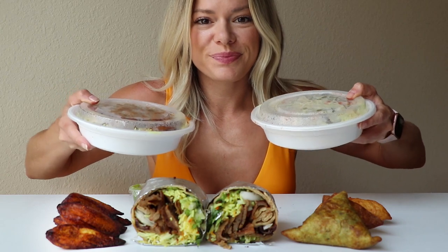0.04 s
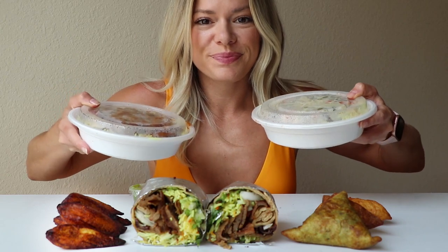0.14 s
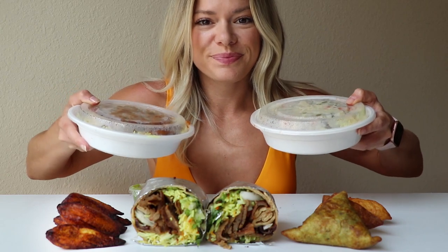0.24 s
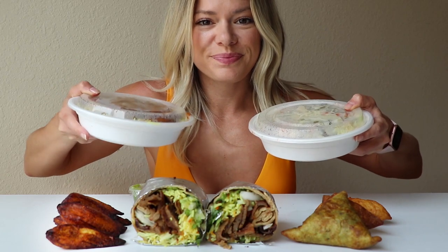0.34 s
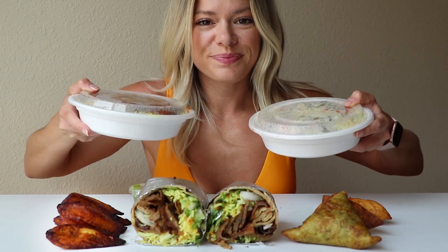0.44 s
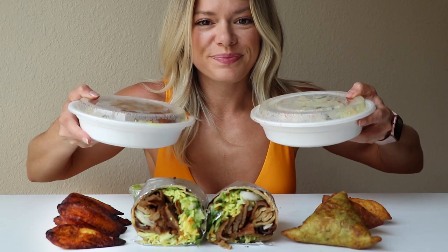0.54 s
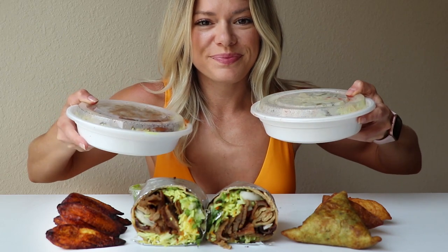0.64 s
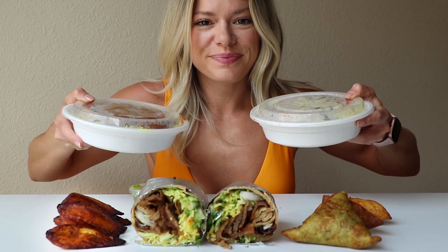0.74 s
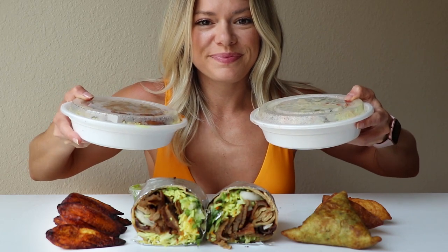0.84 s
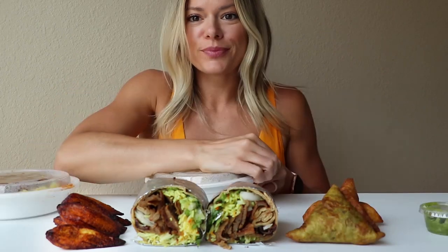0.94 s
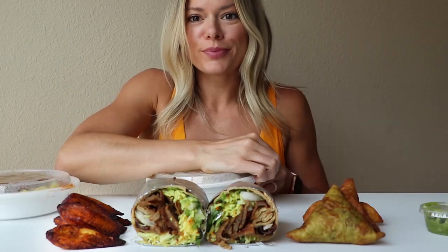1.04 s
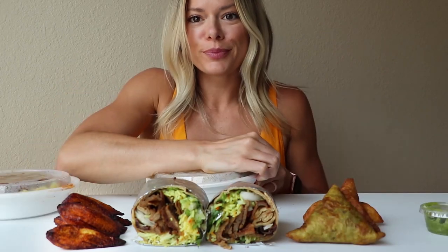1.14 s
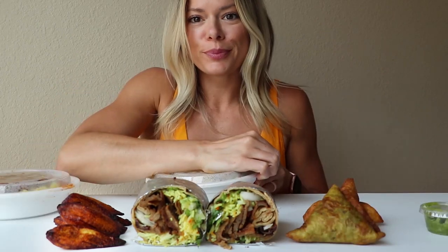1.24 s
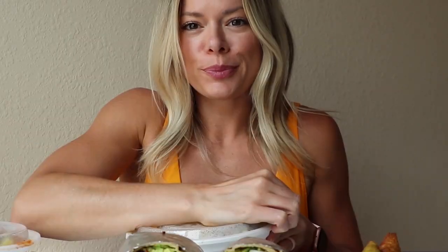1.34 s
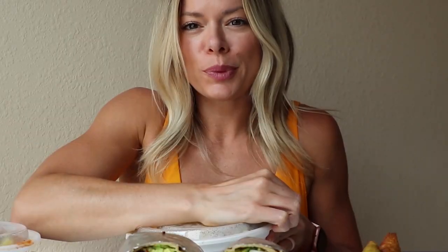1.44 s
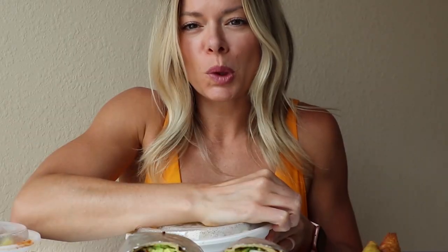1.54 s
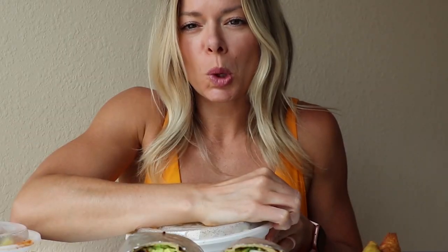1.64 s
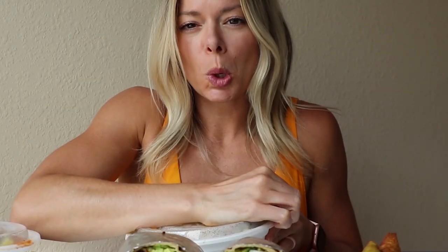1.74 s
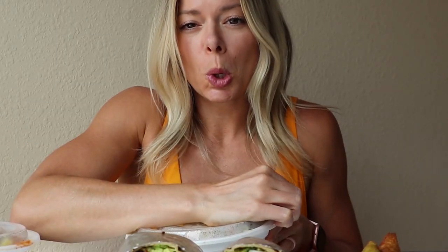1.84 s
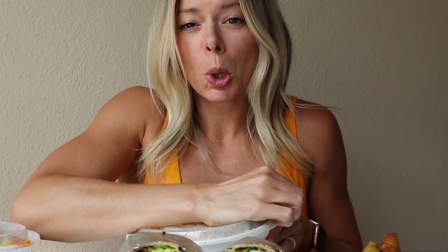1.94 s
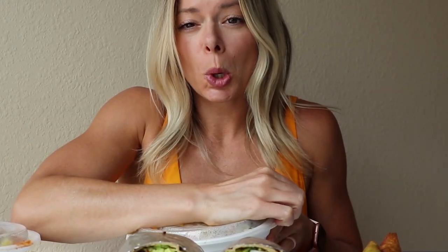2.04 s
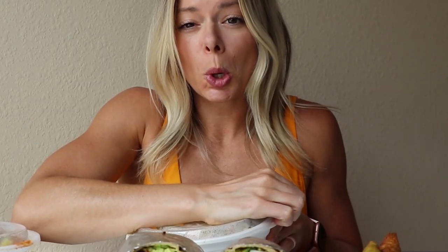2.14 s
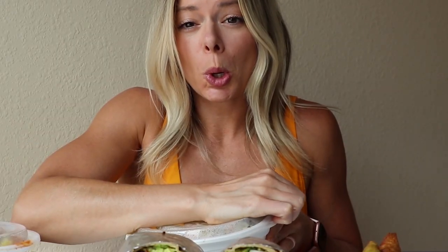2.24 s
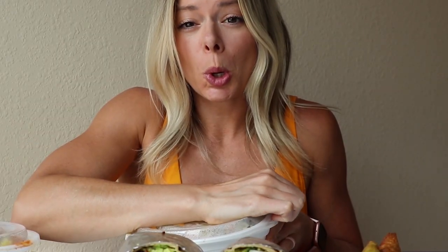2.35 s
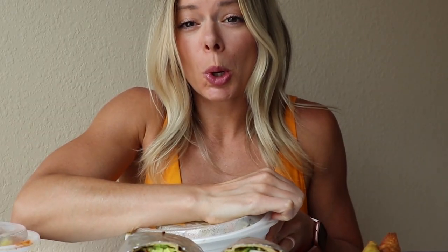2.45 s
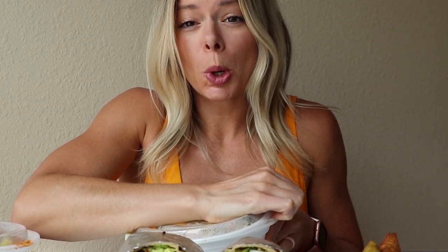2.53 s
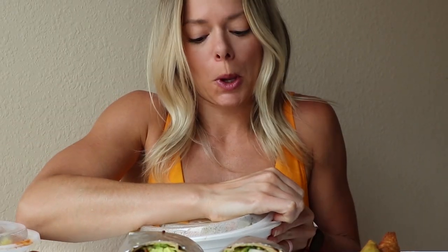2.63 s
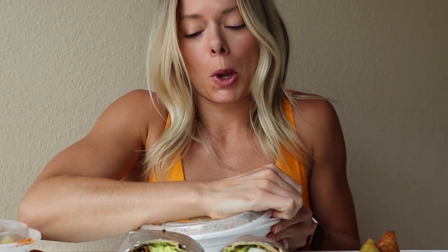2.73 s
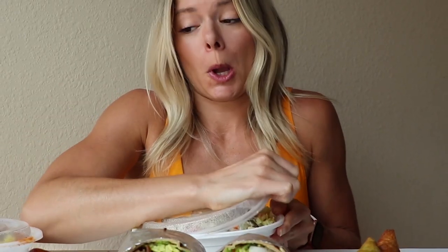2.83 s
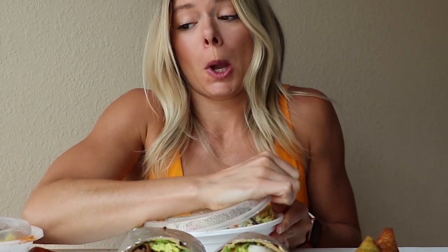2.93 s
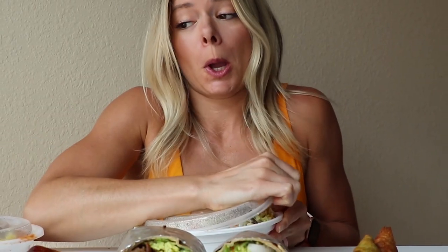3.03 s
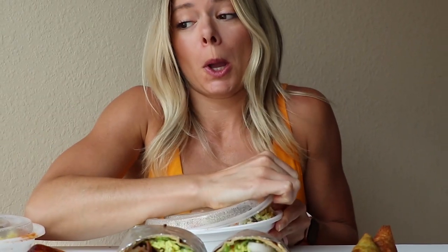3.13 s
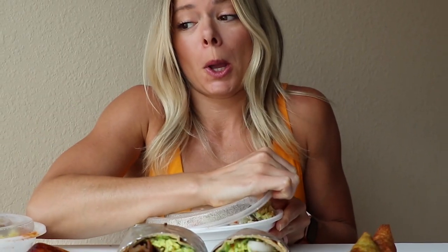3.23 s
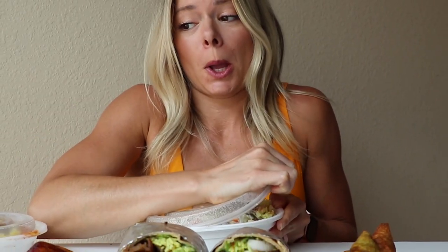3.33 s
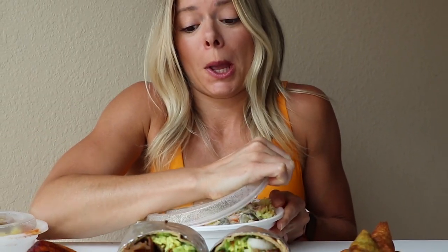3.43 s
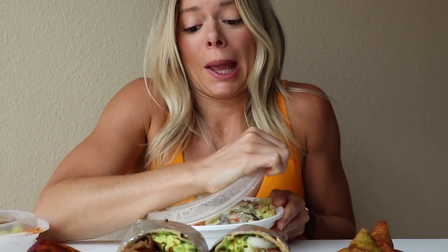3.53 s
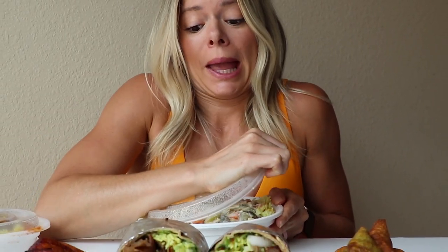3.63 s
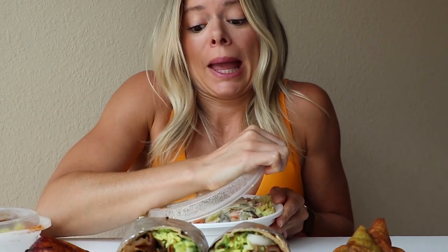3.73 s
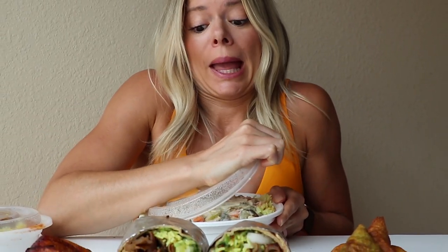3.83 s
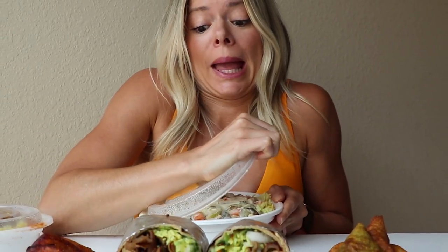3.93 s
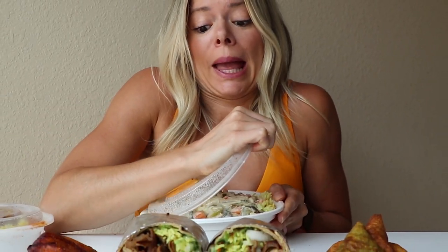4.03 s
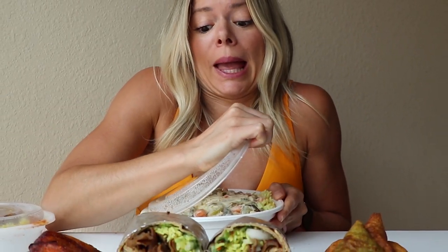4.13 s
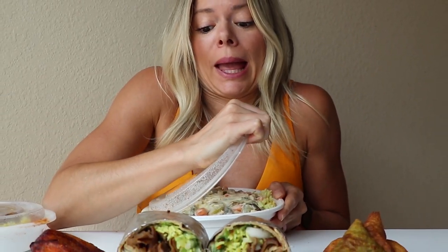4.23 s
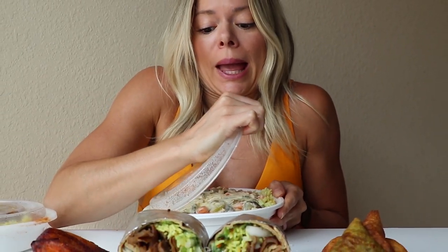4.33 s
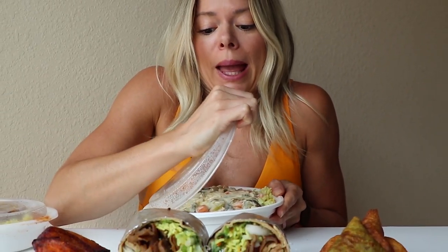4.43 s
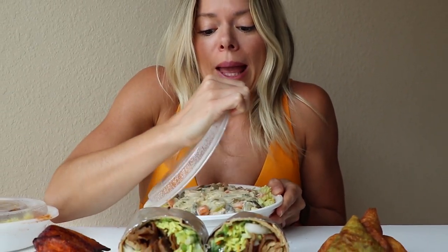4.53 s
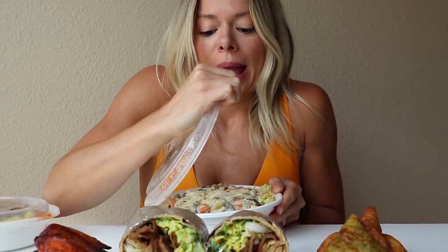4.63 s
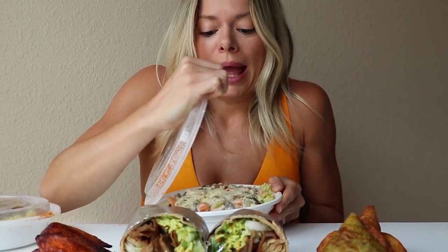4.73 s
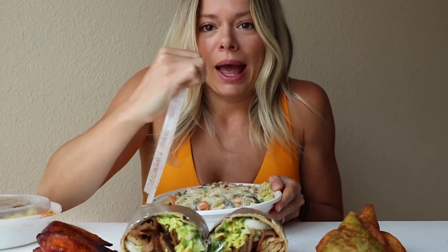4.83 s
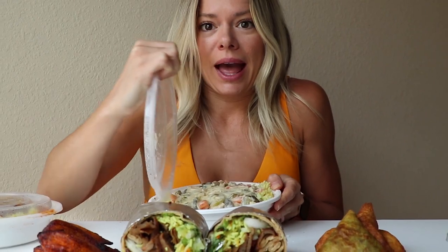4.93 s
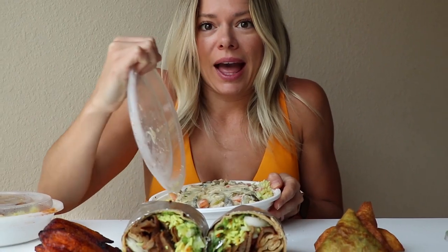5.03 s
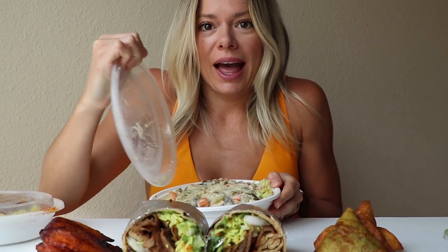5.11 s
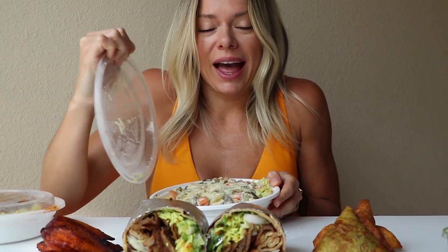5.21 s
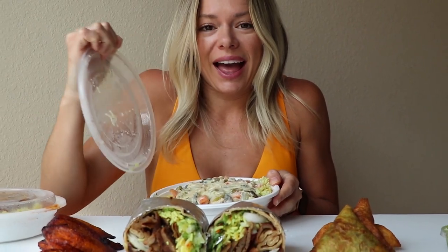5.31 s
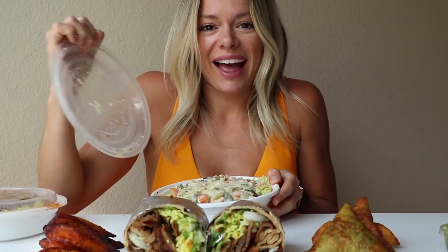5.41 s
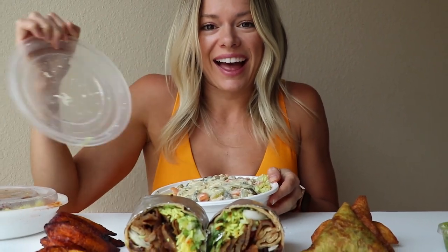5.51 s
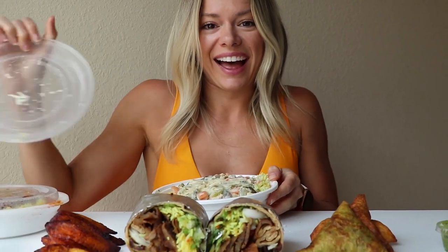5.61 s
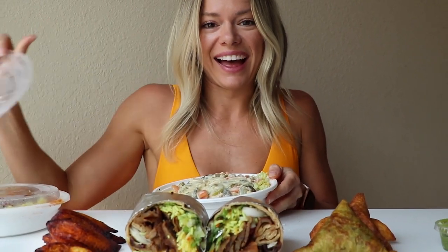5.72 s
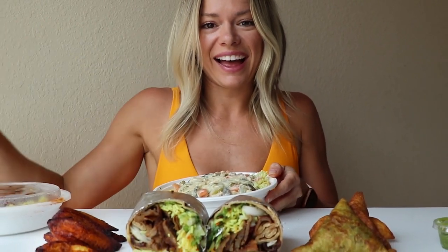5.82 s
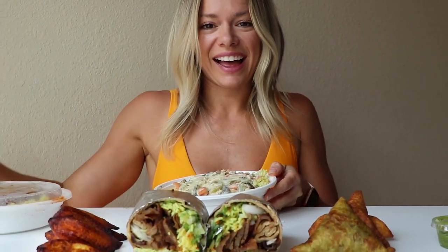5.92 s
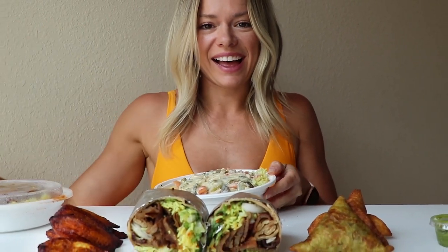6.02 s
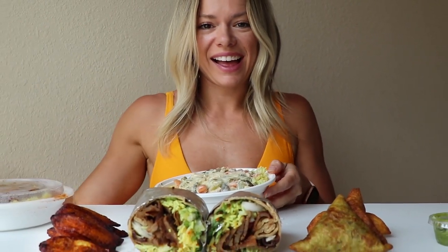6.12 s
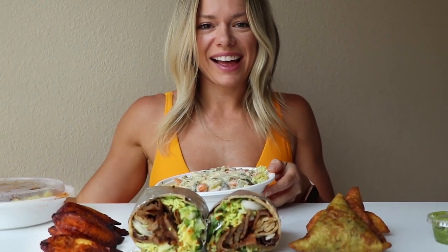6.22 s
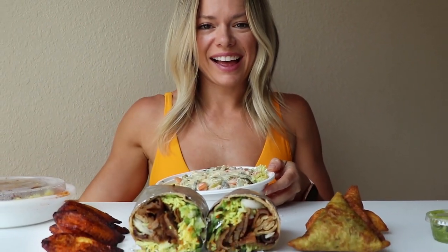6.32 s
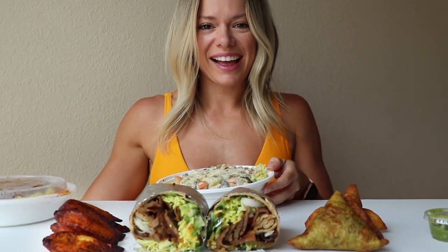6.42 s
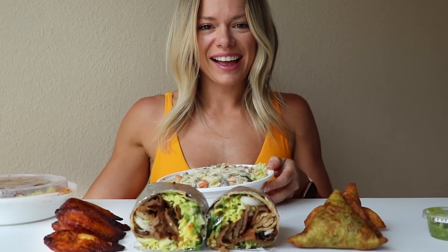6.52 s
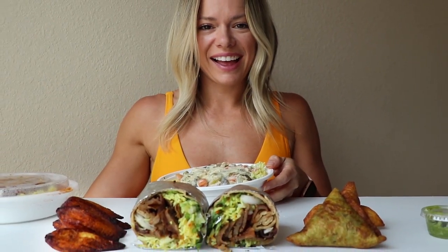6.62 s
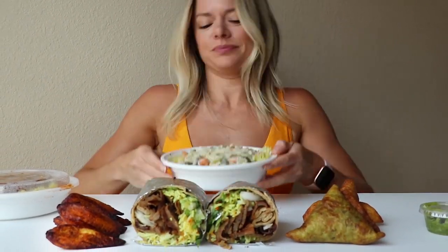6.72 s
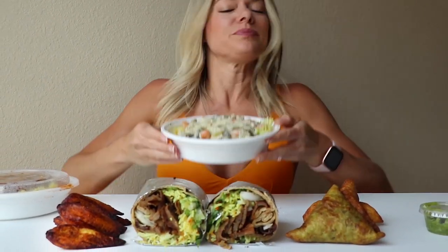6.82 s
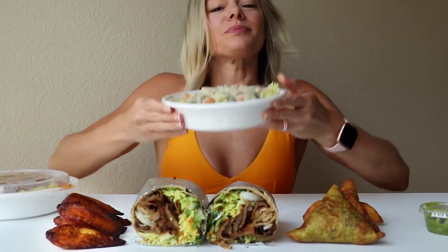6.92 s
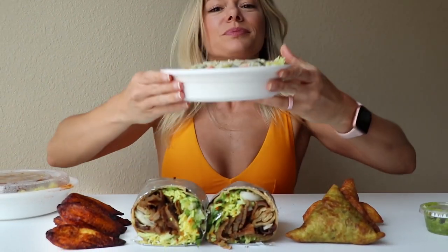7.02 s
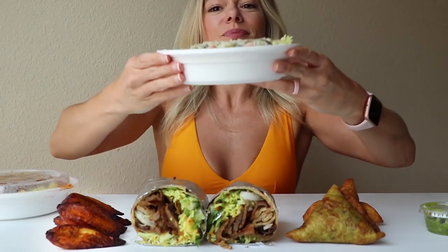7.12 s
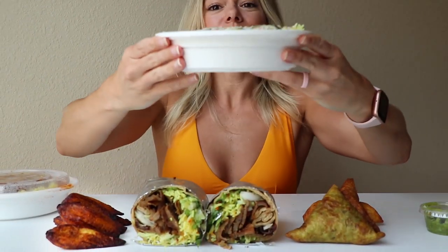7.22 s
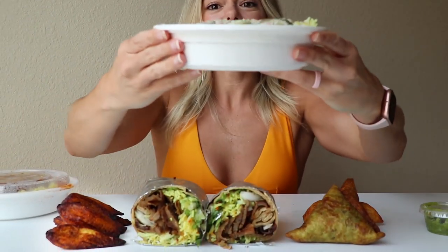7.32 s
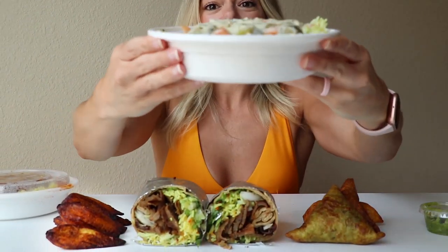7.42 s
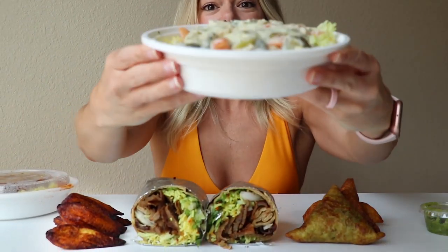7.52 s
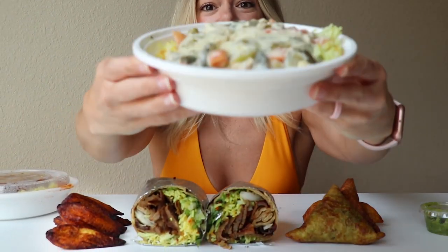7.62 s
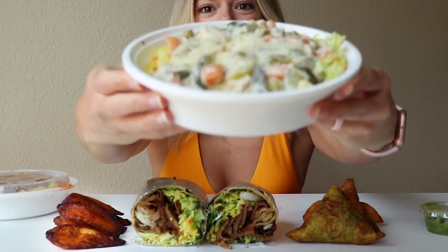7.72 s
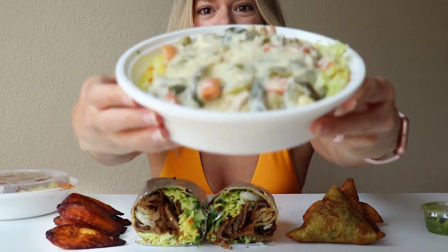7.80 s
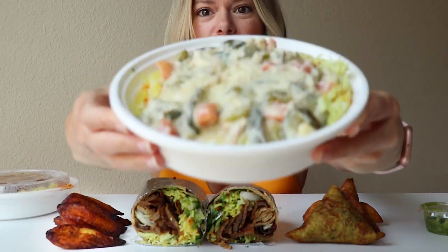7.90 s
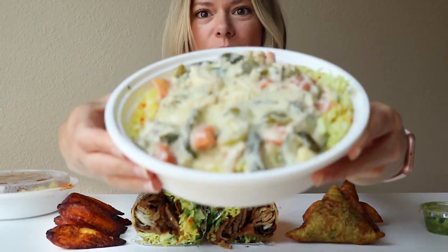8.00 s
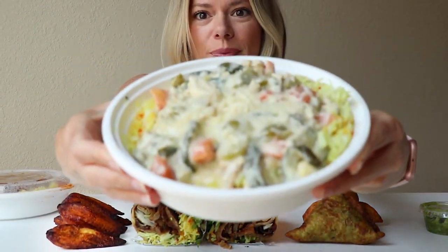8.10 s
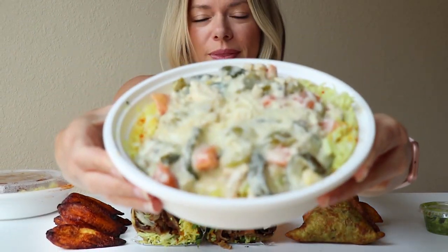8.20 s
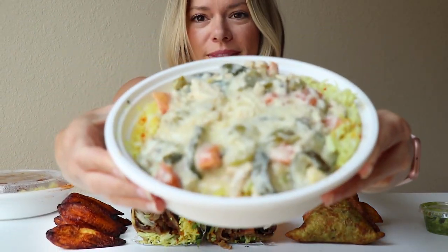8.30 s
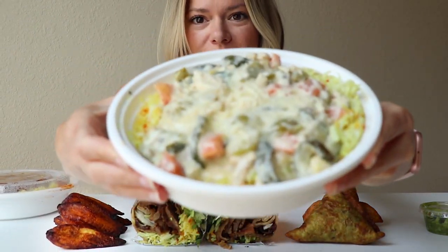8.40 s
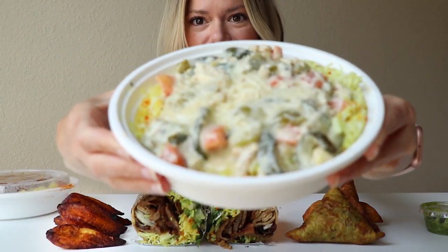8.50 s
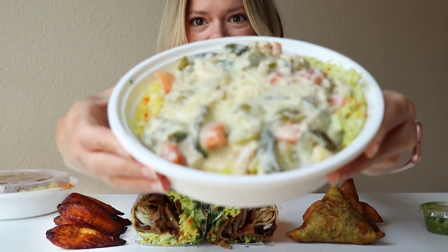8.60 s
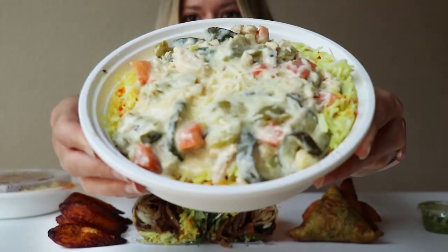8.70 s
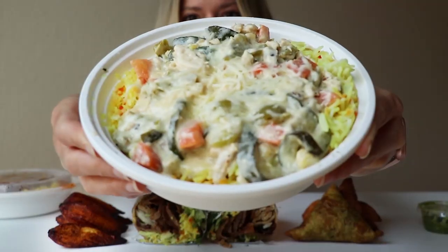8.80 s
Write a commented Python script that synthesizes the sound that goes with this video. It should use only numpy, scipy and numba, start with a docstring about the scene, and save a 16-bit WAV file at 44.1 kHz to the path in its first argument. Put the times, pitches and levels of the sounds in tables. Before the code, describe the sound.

Fingers tap softly on a thin plastic lid, then pry it off a takeout bowl. The rim creaks and breaks free in sharp, uneven snaps, the hardest with a low thump, and a quick run of ticks comes before the last ones. The lid lands on the table and rocks to rest, followed by light clicks and a tiny squeak. A stereo microphone about a metre away picks up faint room hush.

```python
"""A thin plastic lid is prised off a plastic bowl on a table, a metre from a stereo microphone.
Over the hush and low hum of a bare room, fingers tap the lid. Its rim creaks as it sticks and slips,
then snaps free tab by tab, and the hardest jolts make the bowl thump. Before the last snaps the rim
ticks over the ribs of the lip. After a soft hiss the lid lands to one side and rocks to rest.
Last, the bowl ticks in the hands and squeaks once."""
import sys
import numpy as np
from scipy import signal
from scipy.fft import rfft, irfft, next_fast_len
from scipy.io import wavfile
from numba import njit

SR = 44100
rng = np.random.default_rng(int(sys.argv[2]) if len(sys.argv) > 2 else 0)


def wav_record(signal):
    """Record a signal, one row per channel, as 16-bit PCM in the file named by sys.argv[1]."""
    frames = np.transpose(np.atleast_2d(signal))
    bounded = np.clip(frames, -1, 1)
    # unit amplitude maps onto the largest positive 16-bit level
    quanta = np.round(bounded * 32767).astype(np.int16)
    wavfile.write(sys.argv[1], SR, quanta)


N = 390417


def undb(db):
    """Turn decibels (dB) into a number to multiply by."""
    return 10 ** (np.asarray(db) / 20)


def fade(t, fade_s):
    """A curve that dies away: the fade time is how long it takes to drop 60 dB."""
    return np.exp(-np.log(1000) * t / fade_s)


def bump(s, db, half_s):
    """A smooth rise and fall that peaks at second s."""
    return undb(db) * np.exp(-((np.arange(N) / SR - s) / half_s) ** 2)


def level_start(x):
    """Scale a sound so that its first 10 ms have an average (rms) level of 1."""
    return x / np.sqrt(np.mean(x[:SR // 100] ** 2))


def add(out, s, sound):
    """Mix a sound in at second s."""
    i = int(s * SR)
    out[i:i + len(sound)] += sound


def noise_band(size, low_hz, high_hz):
    """Noise between two pitches, with an average level of 1."""
    sos = signal.butter(2, [low_hz, min(high_hz, .45 * SR)], "band", fs=SR, output="sos")
    noise = signal.sosfilt(sos, rng.standard_normal(size))
    return noise / np.sqrt(np.mean(noise ** 2))


def ring(tones, chance, spread_db, detune):
    """Struck plastic rings with its own tones; chance varies the strength, pitch and sign of each."""
    contact_s = .00076  # the soft plastic takes this long to let go
    t = np.arange(4096)[:, None] / SR
    hz, db, fade_s = np.transpose(tones)
    strength, bend, sign = chance[:, :len(hz)]
    gain = undb(db + spread_db * strength) * np.sign(sign) * (1 - np.exp(-t / contact_s))
    waves = np.sin(2 * np.pi * hz * (1 + detune * bend) * t)
    return (gain * fade(t, fade_s) * waves).sum(axis=1)


def crack(band, paths):
    """A click, smeared by waves that run round the thin wall on a few short paths."""
    low_hz, high_hz, smear, longest_ms = band
    path_samples = np.ceil(paths * longest_ms * SR / 1000)
    delay = np.exp(-2j * np.pi * np.fft.rfftfreq(2048)[:, None] * path_samples)
    click = irfft(np.prod((delay - smear) / (1 - smear * delay), axis=1))  # delays some pitches more
    sos = signal.butter(3, [low_hz, high_hz], "band", fs=SR, output="sos")
    return level_start(signal.sosfilt(sos, click))


def blows(rows, low_tones=None, edge_band=None):
    """Each blow rings the rim and the body of the plastic and cracks in its wall and edge at once."""
    # Each row of both: pitch in Hz, level in dB, fade time in seconds.
    body_tones = [(307.6, -1, 0.04), (353, 0, 0.04), (445, 1, 0.039), (520, 1.5, 0.027)]
    rim_tones = [(657, 3, 0.035), (743, -1.5, 0.038), (866.4, -0.5, 0.038), (964, -5.5, 0.023),
                 (1050, -4, 0.03), (1201, -2.5, .02), (1256, 0, 0.024), (1341, 0, 0.023), (1451, -1, 0.021),
                 (1600, -2.5, 0.015), (1887, 0, 0.017), (2190, -6.5, 0.013), (2770, -6.5, .012)]
    # Higher tones blur into bands. Each gives: low and high Hz, smear from 0 to 1, longest path in ms.
    wall_band = (1310, 3790, 0.56, 1.6)
    whole_edge = (3490, 12100, 0.39, .6)
    focus_db, focus_octaves = 8, .41  # rim tones far from a blow's focus pitch are weaker
    out = np.zeros((2, N))
    for s, rim_db, body_db, wall_db, edge_db, focus_hz in rows:
        chance = rng.standard_normal((2, 3, len(rim_tones)))
        paths = rng.uniform(.1, 1, (2, 3))
        focused = []
        for hz, db, fade_s in rim_tones:
            nearness = np.exp(-(np.log2(hz / focus_hz) / focus_octaves) ** 2)
            focused.append((hz, db - focus_db * (1 - nearness), fade_s))
        rim = ring(focused, chance[0], spread_db=2.5, detune=.012)
        body = ring(low_tones or body_tones, chance[1], spread_db=2.5, detune=.005)
        sound = undb(rim_db) * rim / np.abs(rim).max() + undb(body_db) * level_start(body)
        add(sound, 0, undb(wall_db) * crack(wall_band, paths[0]))
        add(sound, 0, undb(edge_db) * crack(edge_band or whole_edge, paths[1]))
        add(out[0], s, sound)
        add(out[1], s + .00004 * rng.standard_normal(), sound)  # one side hears it a little sooner
    return out


def lid_blow(s, rim_db, edge_db, focus_hz):
    """One row for blows(): body and wall sit below the level midway between rim and edge."""
    middle_db = (rim_db + edge_db) / 2
    return s, rim_db, middle_db - 13.5, middle_db - 9.5, edge_db, focus_hz


def hush():
    """The steady hush of room and microphone, most alike left and right in the bass."""
    # Each row: pitch in Hz, relative level in dB.
    colour = [(12, -40.5), (20, -10), (49, -1.5), (77, -11), (158, -12.5), (234, -5), (377, -9.5),
              (410, -7), (499, -13.5), (1190, -16.5), (1530, -19), (1960, -20.5), (4670, -27),
              (9950, -24.5), (16000, -36.5)]
    # Each row: pitch in Hz, likeness of left and right from 0 to 1.
    likeness = [(60, 0.61), (300, 0.7), (1000, 0.03), (2500, 0.03), (12000, 0)]
    size = next_fast_len(N)
    log_hz = np.log(np.maximum(np.fft.rfftfreq(size, 1 / SR), 1))
    db, alike = (np.interp(log_hz, np.log(hz), values) for hz, values in (zip(*colour), zip(*likeness)))
    spectrum = rfft(rng.standard_normal((2, size))) * undb(db) * np.sqrt([1 + alike, 1 - alike])
    shared, side = irfft(spectrum, size)[:, :N]
    return undb(-54) * np.array([shared + side, shared - side]) / np.sqrt(np.mean(shared ** 2))


def hum_and_thuds():
    """A faint hum near 100 Hz, with low, dull table thuds as the lid and bowl are handled."""
    # Each row: peak time in seconds, level in dB, half length in seconds.
    thuds = [(3.64, -50.5, 0.12), (4.072, -49, 0.04), (7.946, -60, 0.027), (8.3, -60.5, 0.2)]
    return (undb(-70) + sum(bump(*thud) for thud in thuds)) * noise_band(N, 94, 105.8)


def finger_taps():
    """Fingers knock lightly on lid and bowl."""
    # Each row: start in seconds, rim, body, wall and edge levels in dB, focus pitch in Hz.
    taps = [(0.975, -42, -54, -64, -76, 1190), (1.023, -33, -52, -61, -72, 1190),
            (1.139, -31.5, -50.5, -57, -74, 1180), (1.2, -45, -59, -47.5, -43, 2000),
            (1.229, -52, -63, -50, -57, 2200), (1.245, -50, -63, -51, -57, 2200),
            (1.36, -27.5, -42, -49, -62, 1290), (1.468, -37, -47, -52, -60, 1100),
            (1.57, -45.5, -64, -60, -58, 950), (6.041, -41, -52, -43.5, -38.5, 1900),
            (6.571, -43.5, -52, -55.5, -66, 1300), (6.813, -40, -55, -44, -41.5, 1900),
            (7.337, -47.5, -63, -57, -64, 1900), (7.356, -46, -57, -49.5, -50, 1900),
            (7.49, -33, -43.5, -34.5, -36.5, 1900), (7.948, -43, -51, -41, -52, 1500),
            (8.105, -42, -54, -43.5, -58, 1400)]
    return blows(taps)


def creaks():
    """The rim sticks and slips at uneven gaps; each creak starts softly, grips, then weakens."""
    # Each row: start and length in seconds, rim, body and edge levels in dB, focus pitch in Hz.
    spells = [(1.729, .05, -45, -47.5, -65, 900), (2.033, 0.082, -43, -54, -78, 900),
              (2.153, .14, -36.5, -58.5, -75.5, 800), (2.422, 0.043, -43, -63, -63, 1000),
              (2.488, 0.058, -28.5, -51, -77, 950), (2.601, 0.064, -54, -54, -79, 900),
              (2.811, 0.036, -32.5, -48.5, -80.5, 800), (3.333, 0.082, -34.5, -51.5, -89, 800),
              (3.424, .06, -32.5, -52.5, -65.5, 850), (3.87, 0.24, -27, -62, -66.5, 890),
              (4.176, 0.16, -30.5, -55, -57.5, 900)]
    slips_per_s, sag_db_per_s = 170, 56
    grip_db, grip_s = -4.5, .018
    slips = []
    for start, length, rim_db, body_db, edge_db, focus_hz in spells:
        ages = np.cumsum(rng.lognormal(0, .35, size=100)) / slips_per_s
        uneven_db = rng.exponential(size=100) - 1
        changes_db = grip_db * np.exp(-ages / grip_s) - sag_db_per_s * ages + uneven_db
        wall_db = (rim_db + edge_db) / 2
        slips += [(start + age, rim_db + db, body_db + db, wall_db + db, edge_db + db, focus_hz)
                  for age, db in zip(ages, changes_db) if age < length]
    return blows(slips)


def snaps():
    """The lid snaps free of the bowl's lip, tab by tab."""
    # Each row: start in seconds, rim and edge levels in dB, focus pitch in Hz.
    tabs = [(1.733, -28.5, -52, 930), (1.747, -30, -47, 840), (1.78, -52, -45, 1000),
            (1.817, -61, -52, 1000), (1.847, -26.5, -46, 1300), (1.854, -13.5, -24, 1340),
            (1.864, -13, -20.5, 1200), (2.05, -29.5, -56, 1010), (2.077, -20, -42.5, 1370),
            (2.11, -28, -47.5, 900), (2.16, -23.5, -47, 780), (2.413, -40.5, -62, 1000),
            (2.438, -23.5, -42, 1260), (2.486, -23.5, -60, 960), (2.596, -26.5, -59.5, 950),
            (2.8885, -6.5, -11, 1210), (2.8927, -5.5, -18, 1010), (3.334, -36.5, -68.5, 800),
            (3.376, -33, -75, 800), (3.449, -30, -58, 850), (3.491, -10, -21, 760), (3.533, -15, -32, 1000),
            (3.584, 0, -17.5, 1080), (3.629, -18, -28.5, 904.3), (3.851, -26.5, -57.5, 917.4),
            (4.333, -17.5, -41.5, 906), (4.346, 0.5, -13.5, 1020), (4.355, -15, -24, 900),
            (4.371, -33.5, -13, 806.7), (4.425, -5.5, -15, 960), (4.5799, -5.5, -16.5, 1340),
            (4.6407, -5, -15.5, 1249)]
    return blows(lid_blow(*tab) for tab in tabs)


def thumps():
    """The hardest jolts shake the full bowl on the table into a low, soft ring."""
    # Each row: pitch in Hz, level in dB, fade time in seconds.
    bowl_tones = [(104.5, -5.5, 0.099), (184.3, 2, 0.18)]
    # Each row: start in seconds, level in dB.
    jolts = [(1.856, -42), (2.89, -38.5), (3.491, -44), (3.585, -32.5), (4.347, -33), (4.427, -40),
             (4.583, -37), (4.643, -34.5), (6.095, -45.5), (7.49, -49.5)]
    out = np.zeros(N)
    for s, db in jolts:
        thump = ring(bowl_tones, rng.standard_normal((3, 2)), spread_db=1.7, detune=.005)
        add(out, s, undb(db) * level_start(thump))
    return out


def rib_ticks():
    """The peeling rim ticks brightly over the ribs of the lip, about 50 a second."""
    # Each row: start in seconds, edge and rim peak levels in dB.
    ribs = [(3.8783, -42.5, -23), (3.8954, -28, -20), (3.914, -19.5, -19), (3.935, -35.5, -21),
            (3.957, -16.5, -18.5), (3.9773, -34.5, -22), (3.994, -30, -22.5), (3.9997, -17, -16),
            (4.0188, -22, -19), (4.0395, -24.5, -21.5), (4.0475, -22.5, -20), (4.0582, -18.5, -17.5),
            (4.0764, -20.5, -17.5), (4.0971, -20.5, -17.5), (4.111, -29.5, -17.5), (4.1405, -23.5, -20.5),
            (4.1615, -21, -22), (4.1976, -19, -23.5), (4.2205, -21.5, -17), (4.2577, -20.5, -18),
            (4.2833, -27, -21), (4.3005, -22, -17.5)]
    # A rib's narrower crack: low and high Hz, smear from 0 to 1, longest path in ms.
    rib_band = (5870, 10860, .3, .4)
    peak_to_average_db = -17  # the crack's peak, spread over 10 ms
    ticks = [lid_blow(s, rim_db, peak_db + peak_to_average_db, focus_hz=894)
             for s, peak_db, rim_db in ribs]
    return blows(ticks, edge_band=rib_band)


def hiss():
    """A soft hiss just before the lid lands."""
    return bump(s=5.96, db=-58, half_s=.07) * noise_band(N, 1700, 4100)


def lid_landing():
    """The loose lid lands and rocks to rest, ringing with low tones of its own."""
    # Each row: start in seconds, rim, body, wall and edge levels in dB.
    bounces = [(6.093, -18.5, -25.5, -30, -30.5), (6.112, -26, -31, -36, -47), (6.128, -33, -35, -40, -53),
               (6.150, -30, -31, -37.5, -45), (6.170, -30, -35, -45, -54), (6.196, -37, -40, -45, -55),
               (6.240, -25, -35, -43.5, -53.5), (6.262, -28, -34, -48, -60), (6.285, -33, -37, -51, -62),
               (6.310, -28, -35, -51, -64), (6.338, -31.5, -35, -56, -66), (6.365, -39, -38, -61, -70),
               (6.385, -44, -43, -62, -72)]
    # Each row: pitch in Hz, level in dB, fade time in seconds.
    lid_tones = [(272, -3, 0.055), (499.5, 5, 0.054), (610, -4.5, 0.033)]
    focus_hz = 1000
    return blows([(*bounce, focus_hz) for bounce in bounces], low_tones=lid_tones)


def squeak():
    """A short squeak on the bowl that slides down in pitch."""
    peak_s, hz, glide_hz_per_s = 7.5, 3580, -18000
    t = np.arange(N) / SR - peak_s
    return bump(peak_s, db=-51, half_s=.009) * np.sin(2 * np.pi * (hz + glide_hz_per_s * t / 2) * t)


def stereo_octave(hz, alike):
    """One second of noise, an octave wide, partly shared by left and right."""
    shared, side = (noise_band(SR, hz / np.sqrt(2), hz * np.sqrt(2)) for _ in range(2))
    return np.sqrt((1 + alike) / 2) * shared + np.sqrt((1 - alike) / 2) * np.array([side, -side])


def set_energy(x, db):
    """Scale a stereo echo to a total energy in dB."""
    return undb(db) * x / np.sqrt(np.sum(x ** 2) / 2)


def room(sound):
    """Hands, dishes and table scatter the sound; two echoes and a tail follow, the treble dying first."""
    # Each row: pitch in Hz, fade time in seconds, relative level in dB, left-right likeness from 0 to 1.
    tail_bands = [(134, 0.35, 0, 0.8), (257, 0.6, 1.5, 1), (437, 0.67, -3, 0.7), (946, 0.63, 1.5, 0.45),
                  (1860, 0.61, 3, 0.2), (3860, 0.67, 1.5, 0.05), (7000, 0.42, -0.5, 0.77),
                  (13900, 0.12, -8, 0.2)]
    # The table top and a near wall. Each row: delay in seconds, level in dB.
    echoes = [(.0043, -8.5), (0.0126, -12)]
    rise_s, scatter_fade_s = .0033, .11
    t = np.arange(SR) / SR
    tail, scatter = np.zeros((2, 2, SR))
    for hz, fade_s, db, alike in tail_bands:
        noise = undb(db) * np.sqrt(hz) * stereo_octave(hz, alike)
        tail += noise * fade(t, fade_s) * (1 - np.exp(-t / rise_s))
        scatter += noise[:, ::-1] * fade(t, scatter_fade_s) * (t > .001)
    response = set_energy(tail, db=-4.5) + set_energy(scatter, db=-5)
    for s, db in echoes:
        arrivals = int(s * SR) + rng.integers(-4, 5, size=2)  # one side hears it a little sooner
        response[[0, 1], arrivals] += undb(db)
    return signal.fftconvolve(sound[None], response, axes=1)[:, :N]


def scene():
    """All the plastic sounds, heard directly and through the room, over the hush, hum and thuds."""
    plastic = lid_landing() + snaps() + rib_ticks() + finger_taps() + creaks()
    plastic += thumps() + hiss() + squeak()
    balance = undb([[.15], [-.15]])  # a touch louder on the left
    return plastic * balance + room(plastic[0]) + hush() + hum_and_thuds()


@njit
def follow_level(x, rise_s, fall_s):
    """Track how loud a sound is, rising fast and sinking slowly."""
    out, level = np.empty(len(x)), 0.
    for i in range(len(x)):
        level += (x[i] - level) / (SR * (rise_s if x[i] > level else fall_s))
        out[i] = level
    return out


def record(dry):
    """A limiter dips the level just after the loudest snaps, whose starts clip; rumble and top are cut."""
    limit_db, ceiling, low_hz, top_hz = -9, .88, 28, 16200
    level = follow_level(np.abs(dry).max(axis=0), rise_s=.0015, fall_s=.1)
    gain = np.minimum(1, undb(limit_db) / (level + 1e-9))
    limited = np.clip(dry * gain, -ceiling, ceiling)
    no_rumble = signal.sosfilt(signal.butter(2, low_hz, "high", fs=SR, output="sos"), limited)
    return signal.sosfilt(signal.ellip(12, .2, 95, top_hz, fs=SR, output="sos"), no_rumble)


dry = scene()
out = record(dry)
wav_record(out)
```